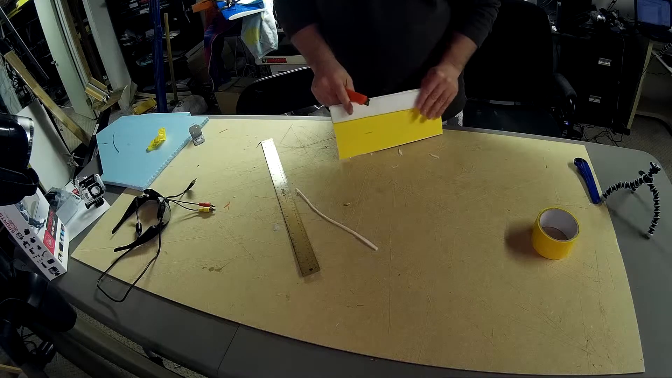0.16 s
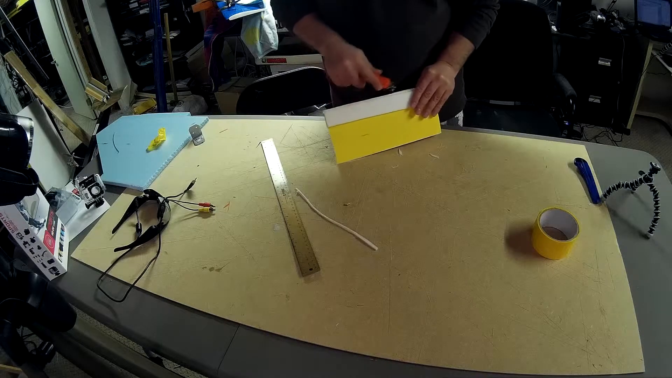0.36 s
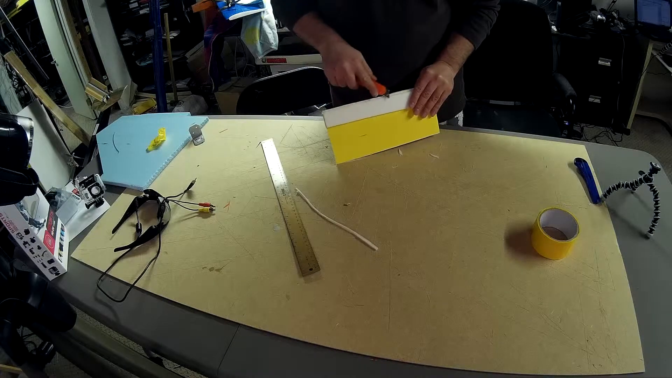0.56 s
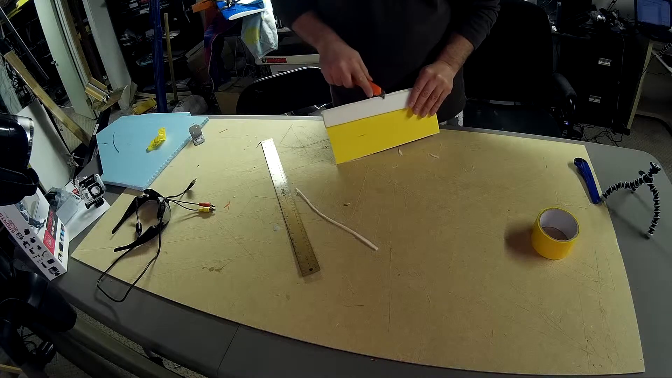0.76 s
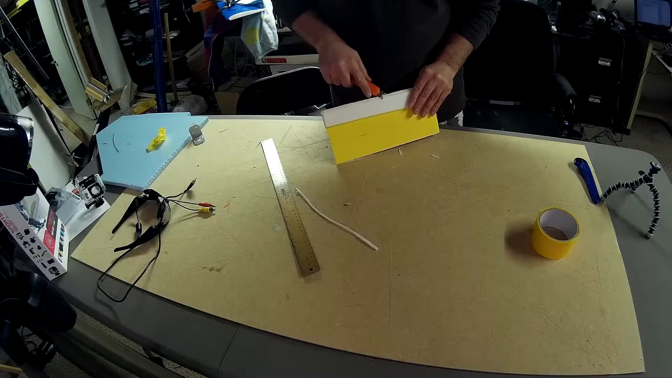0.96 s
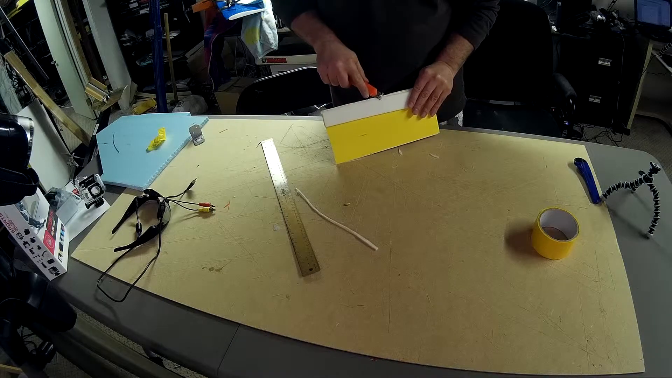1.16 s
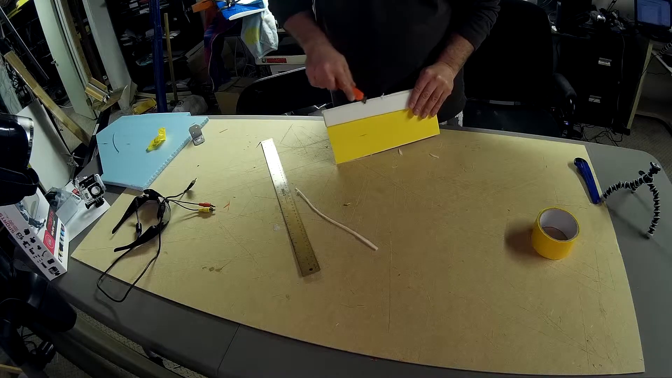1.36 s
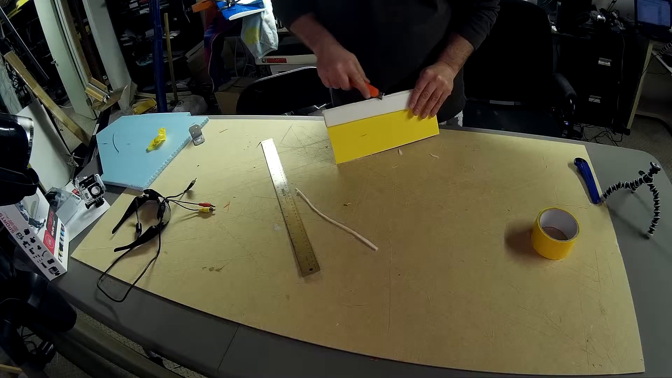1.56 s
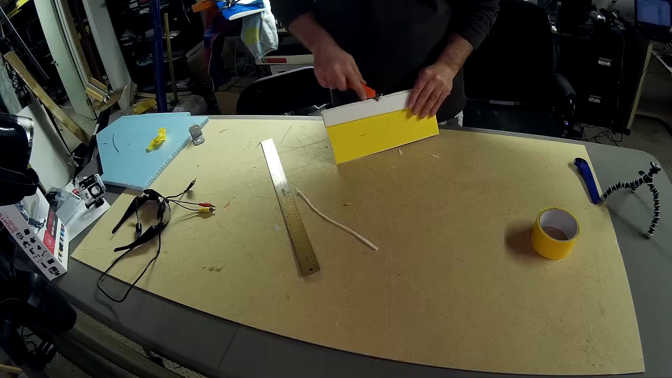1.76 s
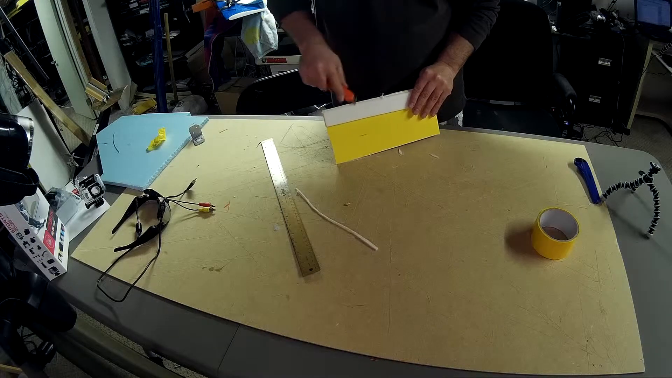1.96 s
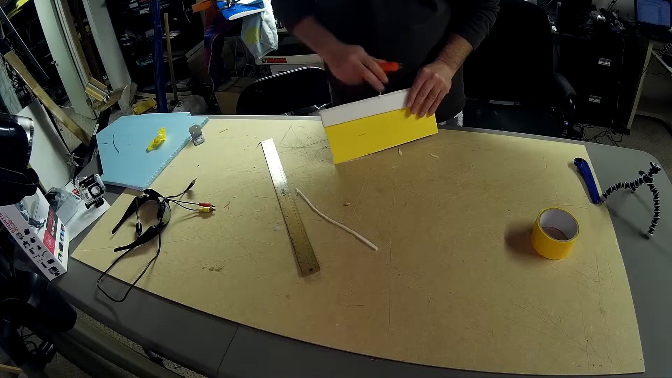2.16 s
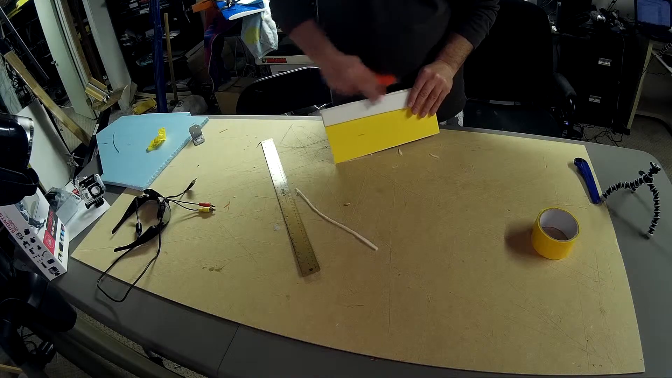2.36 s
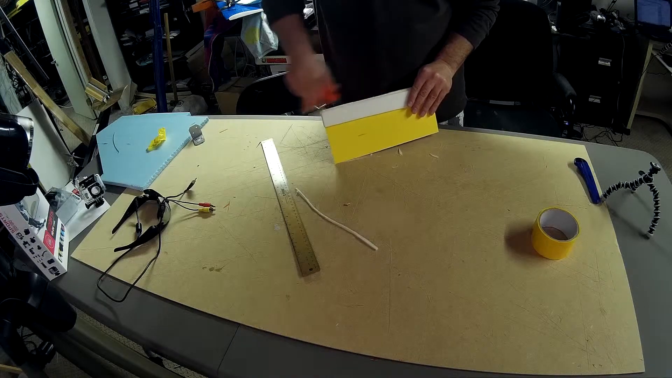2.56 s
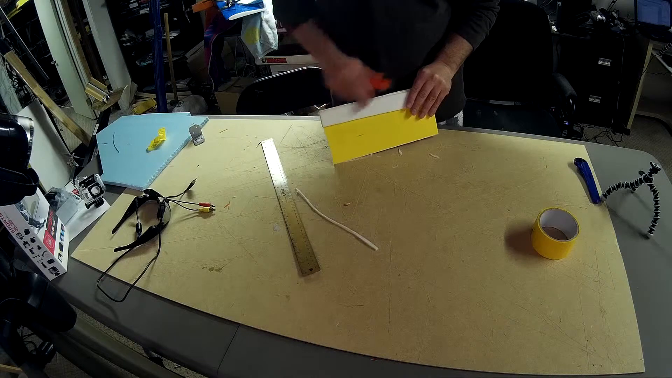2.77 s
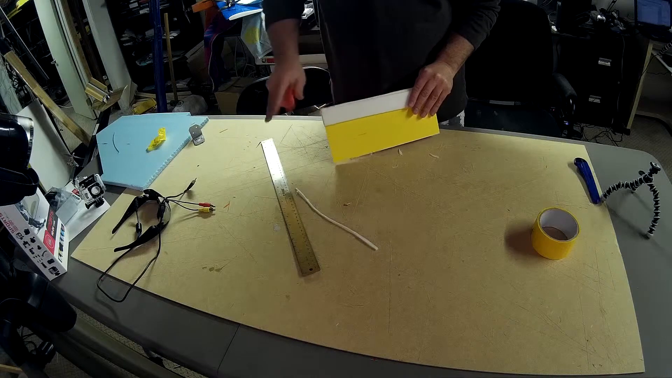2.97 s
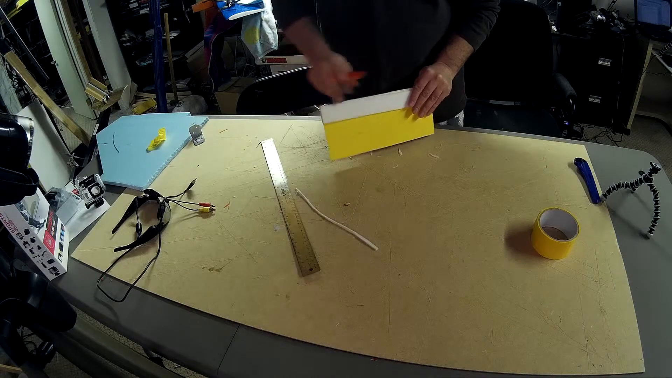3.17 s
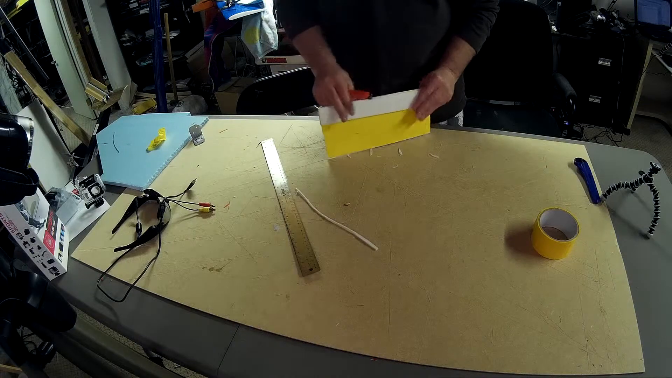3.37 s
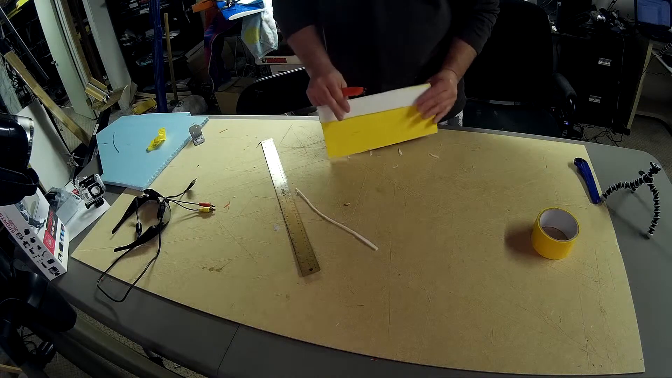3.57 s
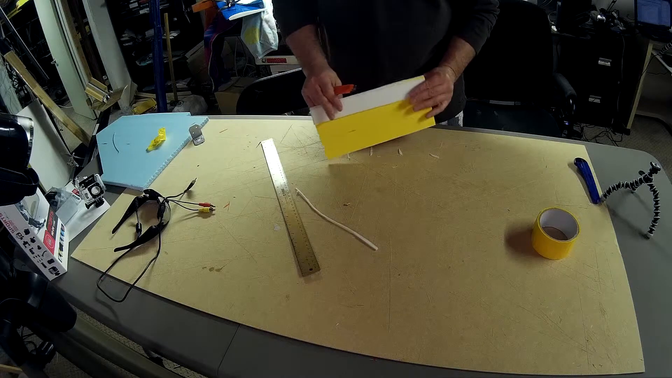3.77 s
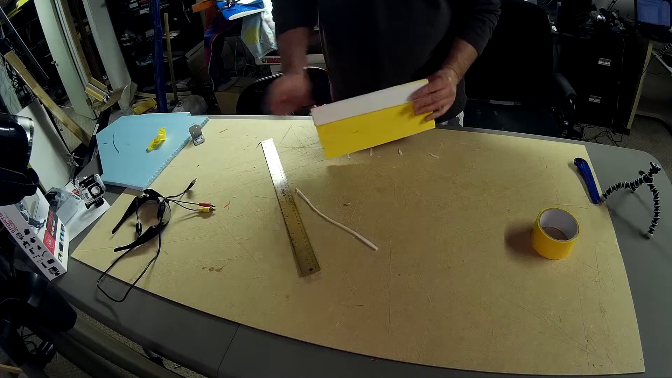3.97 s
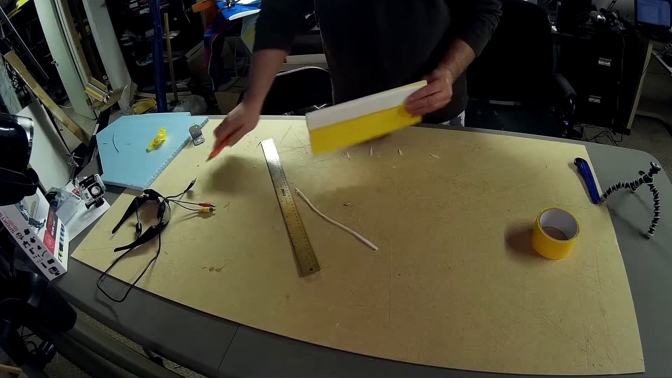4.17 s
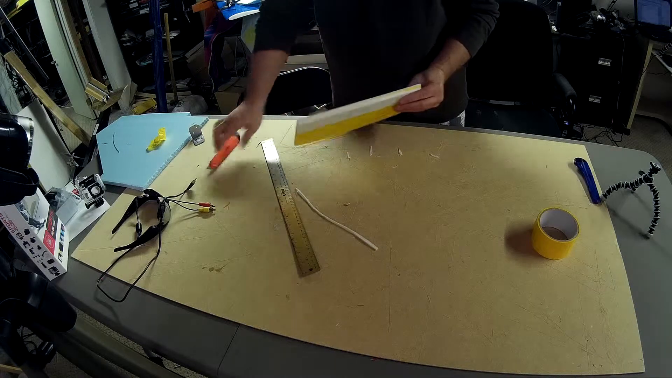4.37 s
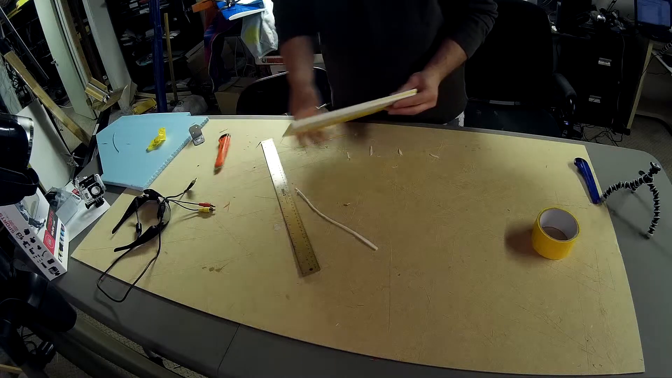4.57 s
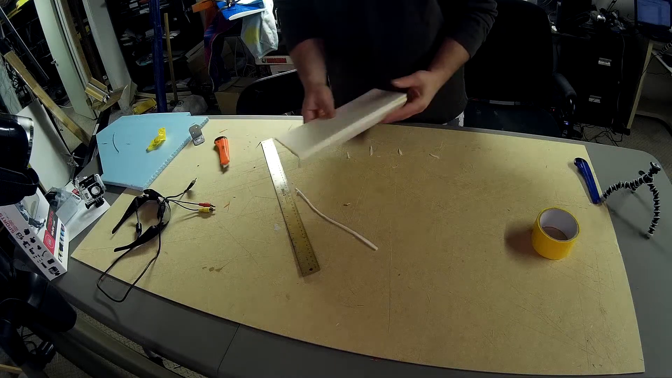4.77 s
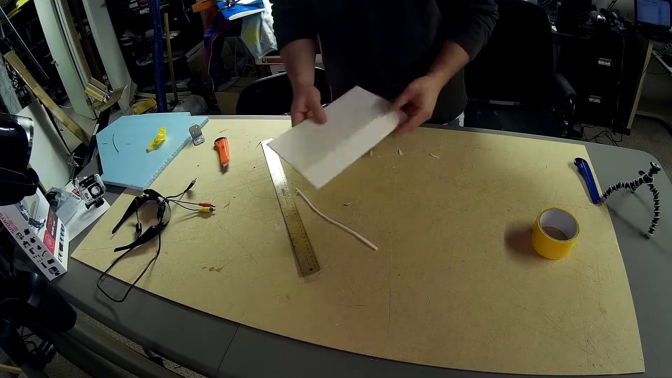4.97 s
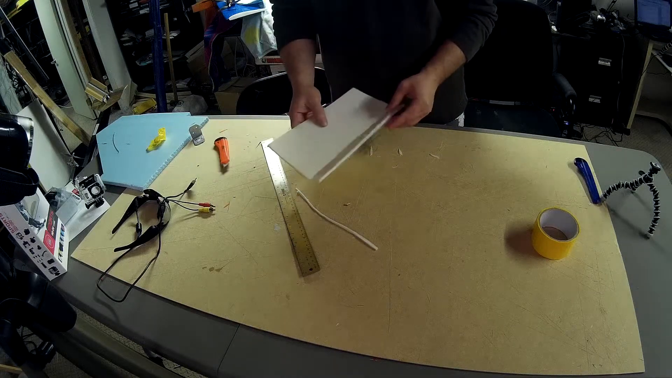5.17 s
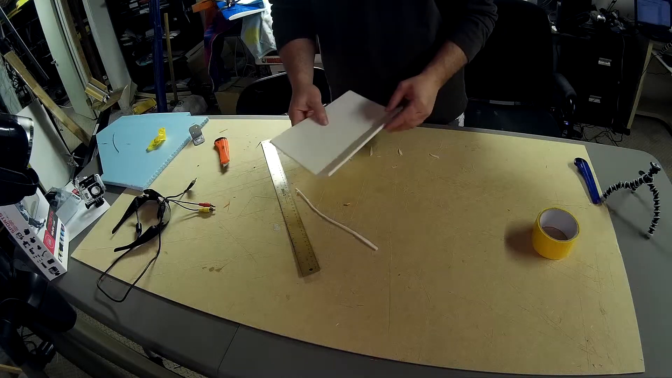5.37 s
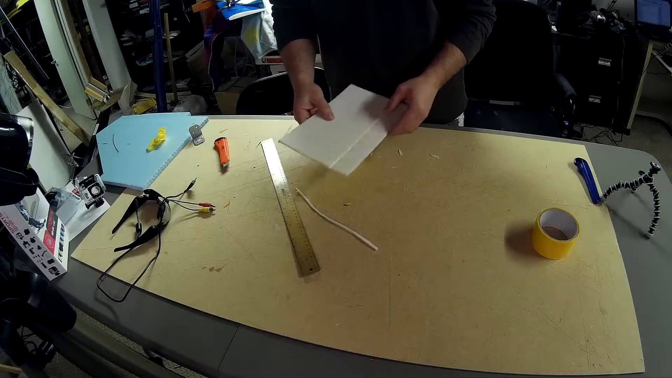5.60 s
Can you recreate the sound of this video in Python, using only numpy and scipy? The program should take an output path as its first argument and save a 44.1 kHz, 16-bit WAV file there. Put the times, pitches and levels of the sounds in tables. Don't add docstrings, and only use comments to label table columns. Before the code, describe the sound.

Faint, grainy foam shaving comes in short uneven strokes, then two stronger crumbly sweeps, with a dull board thump and a flick. After a few soft brushes, tiny ticks lead to a sharp knife drop with quick bounces on wood. The light board knocks, slaps down flat and creaks. Short room reflections, steady hiss and motor hum; close-miked by a small camera, right channel silent.

```python
import sys
import numpy as np
from scipy import signal
from scipy.fft import rfft, irfft
from scipy.io import wavfile
from scipy.ndimage import uniform_filter1d

SR = 44100
rng = np.random.default_rng(int(sys.argv[2]) if len(sys.argv) > 2 else 0)


def store_pcm(level_fs):
    pcm = np.round(np.clip(level_fs, -1, 1) * 32767).astype(np.int16)
    wavfile.write(sys.argv[1], SR, np.atleast_2d(pcm).T)


def voltage_ratio(level):
    return 10 ** (np.asarray(level, float) / 20)


N = 248503

# [f/Hz, level/dB, time to fall 60 dB/s]
BOARD_TONES = [(570, -6, 0.12), (691, 1, 0.068), (937, -2, 0.14), (1160, -12, 0.092), (1390, -26, 0.056),
               (1730, 0.5, 0.12), (2270, -25, .1), (2430, 6, 0.057), (3130, -17.5, 0.12)]
# [f/Hz, level/dB, time to fall 60 dB/s]
BENCH_MIDDLE = [(169, 3.5, 0.3), (277, -13, 0.092), (303.5, 5, 0.15), (323, -2.5, 0.08), (428, -5.5, 0.17)]
BENCH_NEAR = [(109, -7, 0.17), (161, 0.5, .14), (218, 0, 0.11), (251, 2.5, 0.063), (290.3, 0, 0.15),
              (417, -17, 0.14)]
# [f/Hz, width/Hz, level/dB]
FOAM_MIDDLE = [(2033, 330, 5.5), (2553, 630, 7.3), (3195, 760, 2), (3770, 1530, 6.2), (5110, 390, 3.7),
               (5575, 1110, 1.5)]
FOAM_TREBLE = [(8050, 340, 1.5), (9600, 1870, 2.5), (11400, 1600, -4.5), (13800, 2600, -15)]


def unit(x):
    return x / np.sqrt(np.mean(x ** 2))


def top(x):
    return x / np.max(np.abs(x))


def ring(x, peaks):
    return sum(voltage_ratio(db) * signal.lfilter(*signal.iirpeak(hz, hz / width, fs=SR), x) for hz, width, db in peaks)


def walk(rate, size=N):
    k = int(SR / rate)
    steps = np.repeat(rng.standard_normal(size // k + 1), k)
    return 0.71 * uniform_filter1d(uniform_filter1d(steps, k), k)[:size]


def fade(t, t60):
    return np.exp(-np.log(1000) * t / t60)


def swell(strokes, roundness):
    t = np.arange(N) / SR
    total = np.zeros(N)
    for start, db, rise, hold, fall in strokes:
        away = np.maximum((start - t) / rise, (t - start - hold) / fall)
        total += voltage_ratio(db - 20 * np.maximum(away, 0) ** roundness)
    return total


def foam_crackle():
    # [f/Hz, width/Hz, level/dB]
    foam_low = [(160, 25, 0.5), (223.7, 44, 1), (284, 42, -2), (415, 34, -8)]
    foam_body = [(525, 88, 0.5), (742, 153, 7.5), (942, 355, 4.5), (1455, 140, 9)]
    cells = rng.standard_normal(N) * voltage_ratio(1.83 * rng.exponential(size=N)) * (rng.random(N) < .4)
    cells = cells * voltage_ratio(0.99 * walk(65) + 2.2 * walk(250))
    rings = []
    for group in (foam_low, foam_body, FOAM_MIDDLE, FOAM_TREBLE):
        total = np.zeros(N)
        for hz, width, db in group:
            narrow = ring(cells, [(hz, width, db)])
            total += voltage_ratio(1.3 * walk(45)) * ring(narrow, [(hz, 3 * width, 0)])
        rings.append(unit(total))
    return rings


def rub(crackle, strokes, roundness, bench_db, body_db, middle_db, sharp_db):
    levels_db = (bench_db, body_db, middle_db, sharp_db)
    return swell(strokes, roundness) * sum(voltage_ratio(db) * band for db, band in zip(levels_db, crackle))


def shaving(crackle):
    # [t/s, level/dB, rise by 20 dB/s, hold/s, fall by 20 dB/s]
    shaves = [(0.0, -57.5, .02, 0.071, 0.73), (.3, -67.5, 0.2, 0.0088, 0.046), (.42, -75, 0.06, 0.17, 0.15),
              (.738, -66.5, 0.047, .005, 0.18), (.852, -70.5, 0.03, 0.0057, 0.092),
              (1.228, -62, 0.056, 0.0037, .025), (1.315, -59.5, 0.06, 0.041, 0.2),
              (1.39, -66.5, 0.058, 0.045, .1), (1.47, -65, 0.06, 0.053, 0.015),
              (1.88, -60, 0.07, 0.063, 0.04), (1.968, -52, 0.034, 0.014, 0.086),
              (2.05, -57.5, 0.072, 0.016, 0.023), (2.14, -70, .015, 0.0028, .045),
              (2.22, -59.5, 0.092, .005, 0.09), (3.64, -61, 0.05, 0.021, 0.39),
              (4.865, -48, .01, 0.017, 0.082)]
    return rub(crackle, shaves, 0.59, bench_db=-10.5, body_db=-2.6, middle_db=0.087, sharp_db=-7)


def sweeping(crackle):
    # [t/s, level/dB, rise by 20 dB/s, hold/s, fall by 20 dB/s]
    sweeps = [
        (2.465, -56.5, 0.031, 0.023, .05),
        (2.52, -46.5, 0.073, 0.039, 0.057),
        (2.6, -49.5, 0.041, 0.024, 0.034),
        (2.905, -47, 0.071, 0.032, 0.054),
        (2.965, -45.5, 0.057, 0.026, .035),
        (3.4, -60.5, 0.057, 0.044, 0.054),
        (3.465, -50, 0.023, 0.0168, 0.072),
    ]
    return rub(crackle, sweeps, 0.97, bench_db=-10, body_db=-5.5, middle_db=0.1, sharp_db=-7)


def tearing(crackle):
    # [t/s, level/dB, rise by 20 dB/s, hold/s, fall by 20 dB/s]
    tears = [
        (2.456, -66, .008, .02, .04),
        (2.519, -56.5, .01, 0.043, .04),
        (2.852, -66, .008, .02, .04),
        (2.901, -59, .015, .02, .04),
        (2.97, -64, .03, .01, .03),
        (3.245, -63.5, .005, .005, .03),
        (4.865, -65, .008, .02, .03),
    ]
    return rub(crackle, tears, 0.66, bench_db=-40, body_db=-20, middle_db=-4, sharp_db=0.1)


def fingers_sliding(crackle):
    # [t/s, level/dB, rise by 20 dB/s, hold/s, fall by 20 dB/s]
    slides = [(2.714, -63, 0.15, .01, 0.14), (3.206, -64, 0.044, .003, 0.048),
              (3.242, -55.5, 0.0056, .003, 0.057), (3.54, -64, .05, 0.079, 0.053),
              (2.975, -44.5, 0.069, 0.024, 0.082), (4.164, -65.5, .02, .005, .1),
              (4.658, -59.5, .02, .005, 0.11), (4.802, -56, 0.0053, .005, 0.024),
              (4.92, -66, .03, 0.05, .06), (5.055, -59.5, .02, 0.015, 0.087),
              (4.42, -66, 0.0092, 0.029, 0.029)]
    return rub(crackle, slides, 0.81, bench_db=-8, body_db=-1.9, middle_db=0.13, sharp_db=-15)


def dragging(crackle):
    # [t/s, level/dB, rise by 20 dB/s, hold/s, fall by 20 dB/s]
    drags = [(.37, -53.5, 0.076, 0.024, 0.1), (2.02, -58, 0.045, 0.0093, 0.138),
             (2.13, -60, 0.04, 0.034, 0.042), (2.51, -67, 0.032, 0.046, 0.034),
             (2.9, -56, 0.079, 0.017, 0.16), (3.03, -49, 0.051, 0.016, 0.061), (3.44, -57, .04, 0.068, .06),
             (4.645, -53, 0.017, 0.028, 0.046), (4.86, -54.5, 0.038, .01, 0.36),
             (5.35, -60, 0.059, 0.075, 0.064), (2.65, -53.5, .03, .02, 0.07)]
    return rub(crackle, drags, 0.69, bench_db=0.1, body_db=-11.5, middle_db=-37, sharp_db=-44)


def gliding(crackle):
    # [t/s, level/dB, rise by 20 dB/s, hold/s, fall by 20 dB/s]
    glides = [
        (.6, -78, .2, 0.55, 0.17),
        (1.6, -76, 0.16, 0.184, 0.078),
        (2.7, -77, 0.11, 0.1, 0.094),
        (3.7, -77.5, 0.18, 0.13, .2),
    ]
    return rub(crackle, glides, 1.3, bench_db=-22, body_db=-8, middle_db=-39, sharp_db=0.1)


def rubbing():
    crackle = foam_crackle()
    ways = (shaving, sweeping, fingers_sliding, dragging, gliding, tearing)
    return sum(way(crackle) for way in ways)


def modes(table, t, focus_hz, t60, spread_oct, twin_share, flip):
    hz, db, own_t60 = np.transpose(table)[:, :, None]
    db = db - 6 * np.abs(np.log2(hz / focus_hz)) / spread_oct
    detune = 1 + 0.029 * rng.standard_normal(hz.shape)
    phase = 2 * np.pi * rng.random(hz.shape)
    side = flip ** np.arange(len(hz))[:, None]
    twin = np.sin(2 * np.pi * hz * detune * t + phase) * (1 - fade(t, 0.025))
    pair = np.sin(2 * np.pi * hz * t) + twin_share * twin
    return np.sum(voltage_ratio(db) * side * pair * fade(t, t60 * np.sqrt(own_t60 / np.median(own_t60))), axis=0)


def bench_thud(bench, t, noise):
    t60 = 0.99 * np.median(bench, axis=0)[2]
    strong = modes(bench, t, 300, t60, 5.9, 0.35, 0.97)
    strong = top(strong * (1 - fade(t, 0.0075)) * voltage_ratio(3.7 * walk(46, size=len(t))))
    weak = ring(ring(noise * fade(t, 0.15), [(256, 155, 0)]), [(294, 450, 0)])
    return strong + voltage_ratio(-10.5) * top(weak)


def contact_crack(t, noise, t60, crack_hz):
    burst = 8.1 * (t == 0) + noise * (fade(t, 0.012) + 0.33 * fade(t, 2.4 * t60))
    total = np.zeros(len(t))
    for hz, width, db in [*FOAM_MIDDLE[1:], *FOAM_TREBLE[:2], (crack_hz, 650, 1.5)]:
        peak = [(hz, width, db - 9 * abs(np.log2(hz / crack_hz)))]
        total += ring(ring(burst, peak), peak)
    return top(total)


def knocks(events, table, bench, t60, spread_oct, rattle_db, chatter_db, push_ms, grip_s, crack_hz):
    out, t = np.zeros(N + SR), np.arange(SR // 3) / SR
    push = np.hanning(int(push_ms * SR / 1000) + 3)
    for start, db, hz, thud_db, crack_db in events:
        noise = rng.standard_normal((4, len(t)))
        blow = (t == 0) + voltage_ratio(chatter_db) * noise[2] * fade(t, 0.31) * (t > .001)
        rattle_bands = [(0.9 * hz, .5 * hz, -3), (0.96 * hz, 0.85 * hz, 0), (1.54 * hz, 1.97 * hz, -3)]
        rattle = top(ring(ring(noise[0] * fade(t, 2.34 * t60), rattle_bands), rattle_bands))
        tones = modes(table, t, hz, .45 * t60, spread_oct, 0.79, -1.067)
        body = top(signal.fftconvolve(tones, np.convolve(blow, push))[:len(t)])
        thud = bench_thud(bench, t, noise[3])
        crack = contact_crack(t, noise[1], t60, crack_hz)
        grip = np.exp(-(t / grip_s) ** 2)
        held = grip * (top(body + voltage_ratio(rattle_db) * rattle) + voltage_ratio(crack_db) * crack)
        i = int(start * SR)
        out[i:i + len(t)] += voltage_ratio(db) * (held + voltage_ratio(thud_db) * thud)
    return out[:N]


def board_taps():
    # [t/s, peak level/dB, loudest ring f/Hz, bench thud/dB, crack/dB]
    taps = [(1.303, -62, 716, -20, -2), (1.884, -54.5, 830, -10, -10), (1.935, -53, 970, -18, -12),
            (1.967, -62.5, 970, -11, -7), (2.139, -66.5, 598, 1, 9), (2.222, -62, 706, -16, 4),
            (1.225, -59, 720, -25, -8), (3.2435, -54, 939, -38, 0), (3.254, -75, 1090, -11, -5),
            (3.464, -55, 725, -20, 3), (.742, -61.5, 850, -25, -8)]
    return knocks(taps, BOARD_TONES, BENCH_MIDDLE, t60=0.14, spread_oct=0.42, rattle_db=-6.5,
                  chatter_db=-34.0, push_ms=0.47, grip_s=0.045, crack_hz=3340)


def board_thumps():
    # [t/s, peak level/dB, loudest ring f/Hz, bench thud/dB, crack/dB]
    thumps = [
        (0.345, -44.5, 566, -3, -32),
        (2.603, -28, 685, -18, -14.5),
        (2.618, -36, 900, -16, -15),
    ]
    # [f/Hz, level/dB, time to fall 60 dB/s]
    thump_tones = [(414, -7, 0.22), (474, -6, 0.18), (565, -6, .1), (720, 6.5, 0.094), (942, 1, 0.062),
                   (970, -31.5, 0.21), (1113, -7, 0.073), (1474, -21, 0.18), (1650, -32, 0.2),
                   (1840, -9, 0.15), (2036, -16, 0.1), (2450, -30, 0.088)]
    return knocks(thumps, thump_tones, BENCH_MIDDLE, t60=0.21, spread_oct=2.5, rattle_db=-0.5,
                  chatter_db=-17.0, push_ms=0.48, grip_s=0.032, crack_hz=3400)


def board_flick():
    # [t/s, peak level/dB, loudest ring f/Hz, bench thud/dB, crack/dB]
    flicks = [
        (2.9925, -34, 920, -21, -10),
        (2.9955, -28.5, 920, -17, -9),
        (3.0105, -33, 766, -20, -6),
        (3.024, -41, 764, -13, -3),
    ]
    # [f/Hz, level/dB, time to fall 60 dB/s]
    flick_tones = [(570, -6, .08), (725, -0.5, 0.15), (830, -9, .06), (933, 1, .08), (1050, -3, .06),
                   (1545, -6, .12), (1734, -9, .14), (2270, -16, .1), (2955, -11, .08), (3160, -9, .08),
                   (3730, -14, .06)]
    return knocks(flicks, flick_tones, BENCH_MIDDLE, t60=0.091, spread_oct=1.6, rattle_db=-3.5,
                  chatter_db=-31, push_ms=0.42, grip_s=0.029, crack_hz=3200)


def knife_ticks():
    # [t/s, peak level/dB, loudest ring f/Hz, bench thud/dB, crack/dB]
    ticks = [
        (4.406, -43, 1260, -10, -10),
        (4.417, -40, 1500, -4.5, 5),
        (4.43, -41, 1900, -1, -6),
        (4.441, -47.5, 1900, 1, -8),
        (4.5895, -40, 700, 8, 5),
        (4.6, -49, 900, 4, 0),
    ]
    # [f/Hz, level/dB, time to fall 60 dB/s]
    tick_tones = [(680, -8, 0.054), (1260, -5, 0.091), (1880, -4.5, .05), (2780, -6, 0.066),
                  (3200, -15, .06), (3900, -21, .05), (4270, -10, .05), (5500, 4, 0.045), (5750, -10, .05)]
    return knocks(ticks, tick_tones, BENCH_NEAR, t60=0.045, spread_oct=4.0, rattle_db=0.85,
                  chatter_db=-19, push_ms=0.28, grip_s=0.055, crack_hz=5370)


def knife_drop():
    # [t/s, peak level/dB, loudest ring f/Hz, bench thud/dB, crack/dB]
    drops = [
        (4.4752, -18, 1250, -7.5, -12.5),
        (4.484, -26, 1100, -13, -10),
        (4.4975, -30, 1390, -14, -12),
        (4.521, -35.5, 1600, -1, -7),
        (4.538, -43.5, 1600, 2, -8),
    ]
    # [f/Hz, level/dB, time to fall 60 dB/s]
    knife_tones = [(671, 2, 0.14), (846, 1.5, 0.08), (1030, -6, 0.14), (1110, 1, 0.12), (1250, 5.5, 0.068),
                   (1391, 4, 0.069), (1605, 2.5, 0.18), (1680, -2.5, 0.18), (1853, 5, 0.07),
                   (2120, -12, 0.14), (2570, -13, 0.066), (3050, 1.5, 0.14), (3310, -7, 0.14),
                   (3480, 3, 0.07)]
    bench_left = [(106, -9.5, 0.67), (157, -1, 0.18), (207, -2.5, 0.19), (249, 4, 0.069),
                  (295.8, -1.5, 0.25), (405, -14, 0.29)]
    return knocks(drops, knife_tones, bench_left, t60=0.092, spread_oct=2.4, rattle_db=-1.1,
                  chatter_db=-26, push_ms=0.25, grip_s=0.051, crack_hz=3700)


def knife_rock():
    # [t/s, peak level/dB, loudest ring f/Hz, bench thud/dB, crack/dB]
    rocks = [
        (4.7265, -37.5, 2350, 4, 5),
        (4.7305, -32, 3470, -5, -6),
        (4.738, -37, 3500, -7, -1),
        (4.752, -38.5, 2400, 4, -5),
        (4.777, -49, 3000, -5, -6),
    ]
    # [f/Hz, level/dB, time to fall 60 dB/s]
    rock_tones = [(732, 2.5, 0.115), (1030, -0.5, 0.086), (1250, 2.5, 0.14), (1870, -3, 0.08),
                  (2170, 1, 0.07), (2620, -13, 0.22), (3058, -7, 0.168), (3190, -7, 0.17), (3480, 0, 0.11),
                  (4032, -13, 0.069), (4317, -12, 0.12), (4990, -18, .15), (6000, -6, .15)]
    return knocks(rocks, rock_tones, BENCH_NEAR, t60=0.042, spread_oct=13.0, rattle_db=1.3,
                  chatter_db=-27.0, push_ms=0.14, grip_s=0.11, crack_hz=3500)


def board_lift():
    # [t/s, peak level/dB, loudest ring f/Hz, bench thud/dB, crack/dB]
    lifts = [
        (4.825, -27, 784, -7, -10.5),
        (4.8345, -37.5, 706, -15, -12),
    ]
    # [f/Hz, level/dB, time to fall 60 dB/s]
    lift_tones = [(678, -4, 0.06), (790, 1, 0.06), (1080, -36, 0.18), (1250, -13, 0.13), (1620, -6.5, 0.14),
                  (2660, -3.5, 0.04), (3330, -7, .2), (3470, -23, 0.093), (3740, -3, 0.14),
                  (4120, 2, 0.045)]
    bench_edge = [(70, 0, 0.11), (107, -8, 0.19), (179, -7, 0.21), (299.7, 1, 0.22), (395, -17.5, .1)]
    return knocks(lifts, lift_tones, bench_edge, t60=0.077, spread_oct=1.0, rattle_db=-8.0,
                  chatter_db=-33.0, push_ms=0.29, grip_s=0.071, crack_hz=5700)


def board_flop():
    # [t/s, peak level/dB, loudest ring f/Hz, bench thud/dB, crack/dB]
    flops = [
        (5.1155, -25.5, 950, -8, -12),
        (5.126, -29, 800, -11.5, -17),
        (5.1335, -30.5, 940, -7.5, -22),
        (5.146, -44, 1060, -1.5, -10),
        (5.164, -46.5, 1500, -9, -12),
    ]
    # [f/Hz, level/dB, time to fall 60 dB/s]
    flat_tones = [(703, -3, 0.059), (772, -1, 0.051), (903, -1, 0.056), (1064, -8.5, 0.134),
                  (1250, -8, 0.074), (1665, -13, 0.18), (2130, -14.5, 0.11), (2600, -9.5, .05),
                  (2920, -16, 0.11), (3580, -9, 0.15), (3900, -24, 0.15)]
    bench_flat = [(112, -2, 0.07), (173.3, -0.5, 0.33), (256, -3.5, 0.11), (309, 2.5, 0.17),
                  (412, 5.5, 0.29), (462, -7, .12), (518, -13, 0.11)]
    return knocks(flops, flat_tones, bench_flat, t60=0.068, spread_oct=3, rattle_db=-7,
                  chatter_db=-36.0, push_ms=0.39, grip_s=0.033, crack_hz=5240)


def card_creaks():
    # [t/s, peak level/dB, loudest ring f/Hz, bench thud/dB, crack/dB]
    creaks = [
        (1.821, -63.5, 678, -30, 7),
        (3.276, -61, 668, -30, 9),
        (4.803, -49.5, 890, -30, 0),
        (4.921, -52, 900, -30, -5),
        (5.546, -64, 1110, -25, -18),
        (5.551, -39.5, 942, -19, -6.5),
        (5.591, -44.5, 920, -36, 5),
        (5.602, -53, 869, -29, 4.5),
    ]
    return knocks(creaks, BOARD_TONES, BENCH_MIDDLE, t60=0.16, spread_oct=0.56, rattle_db=-1.6,
                  chatter_db=-34.0, push_ms=0.11, grip_s=0.027, crack_hz=5850)


def squeaks():
    # [t/s, length/s, f/Hz, level/dB]
    chirps = [
        (4.965, .048, 4450, -73),
        (.008, .02, 5100, -68),
        (.03, .022, 4950, -69),
        (5.29, .23, 1800, -76),
        (4.655, .06, 2600, -75),
        (4.885, .045, 2700, -72),
    ]
    t = np.arange(N) / SR
    total = np.zeros(N)
    for start, length, hz, db in chirps:
        gate = np.clip(np.minimum(t - start, start + length - t) / 0.0015, 0, 1)
        total += voltage_ratio(db + 8.2 * walk(180)) * gate * np.sin(2 * np.pi * hz * t + .5 * walk(100))
    return total


def puffs():
    # [t/s, peak level/dB, length/s]
    gusts = [
        (2.6, -55, .02),
        (2.96, -55, .03),
        (4.833, -53, .02),
        (5.1098, -37.5, .0075),
    ]
    t = np.arange(N) / SR
    total = np.zeros(N)
    for start, db, length in gusts:
        part = np.clip((t - start) / length, 0, 1)
        total += voltage_ratio(db) * np.sin(2 * np.pi * part ** 1.7) * np.exp(-.8 * part)
    return total


def motor():
    # [multiple, level/dB]
    harmonics = [(1, -75), (2, -74), (6, -79), (8, -87)]
    # [t/s, level/dB]
    third = [(0, -67.5), (1.0, -66.5), (2.0, -67), (3.0, -71), (4.1, -73.5), (4.7, -68), (5.63, -72)]
    fourth = [(0, -72), (1.05, -66), (1.65, -63), (2.6, -61), (4.2, -63), (5.63, -63)]
    # [distance from the whine in beats], then [level/dB]
    beats = [-4, -2, -1, 0, 1, 2, 3, 4, 6]
    beats_db = [-90, -89.5, -84.5, -73, -85, -85, -91.5, -88, -93]
    shaft_hz, whine_hz, beat_hz = 30.03, 1447, 55.7
    t = np.arange(N) / SR
    turn = 2 * np.pi * t
    third_db = np.interp(t, *np.transpose(third))
    fourth_db = np.interp(t, *np.transpose(fourth))
    total = np.zeros(N)
    for k, db in [*harmonics, (3, third_db), (4, fourth_db)]:
        total += voltage_ratio(db + 1.3 * walk(7)) * np.sin(k * shaft_hz * turn + 6 * rng.random())
    wobble = 1.53 * walk(8)
    for k, db in zip(beats, beats_db):
        flutter_db = 3.0 if k else 1.2
        tone = np.sin((whine_hz + k * beat_hz) * turn + wobble + 6 * rng.random())
        total += voltage_ratio(db + flutter_db * walk(18)) * tone
    return np.sqrt(2) * total


def air():
    # [f/Hz, level per Hz/dB]
    colour = [(20, -9.5), (68, -15.5), (113, -3), (167, -7.5), (640, -18.5), (1570, -18.5), (1800, -24.5),
              (14900, -33.5)]
    hz, db = np.transpose(colour)
    f = np.arange(N // 2 + 1) * SR / N + 1
    shape = voltage_ratio(np.interp(np.log(f), np.log(hz), db))
    hiss = unit(irfft(rfft(rng.standard_normal(N)) * shape, N))
    rumble = unit(ring(rng.standard_normal(N), [(177, 120, 0), (270.0, 54, -12.0)])) * voltage_ratio(4.3 * walk(7.01))
    return voltage_ratio(-71) * hiss + voltage_ratio(-75.5) * rumble


def room(x, t60, wet_db):
    t = np.arange(SR // 2) / SR
    echoes = rng.standard_normal(len(t)) * fade(t, t60) * (t > .003)
    echoes = echoes / np.sqrt(np.sum(echoes ** 2))
    return x + voltage_ratio(wet_db) * signal.fftconvolve(x, echoes)[:len(x)]


def housing(x):
    # [f/Hz, width/Hz, share removed/0-1]
    shadows = [(4710, 390, .45), (6700, 1000, 0.52), (8950, 710, .4)]
    for hz, width, share in shadows:
        x = x - share * ring(x, [(hz, width, 0)])
    return signal.sosfilt(signal.butter(3, [70, 14500], "band", fs=SR, output="sos"), x)


def scene():
    blows = (board_taps, board_flick, board_thumps, knife_ticks, knife_drop, knife_rock,
             board_lift, board_flop, card_creaks)
    hits = room(sum(blow() for blow in blows), t60=.18, wet_db=-14)
    strokes = room(rubbing(), t60=.15, wet_db=-9)
    near = housing(strokes * voltage_ratio(-7.5) + hits + squeaks())
    background = voltage_ratio(2 + 0.3853 * np.arange(N) / SR) * (motor() + air())
    mono = near + puffs() + background
    return np.array([2 * mono, 0 * mono])


def low_pass(x):
    return signal.sosfilt(signal.butter(12, 16090, fs=SR, output="sos"), x)


def record(dry):
    mix = signal.sosfilt(signal.ellip(8, .2, 60, 15450, fs=SR, output="sos"), dry)
    return low_pass(mix)


dry = scene()
out = record(dry)
store_pcm(out)
```